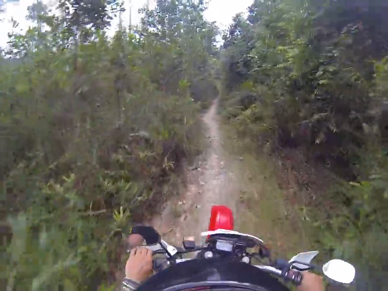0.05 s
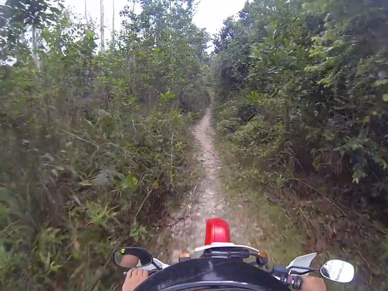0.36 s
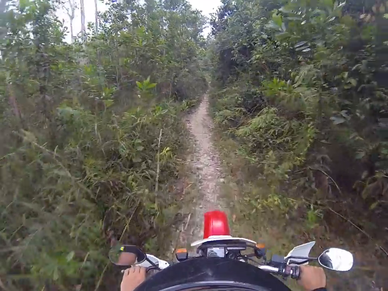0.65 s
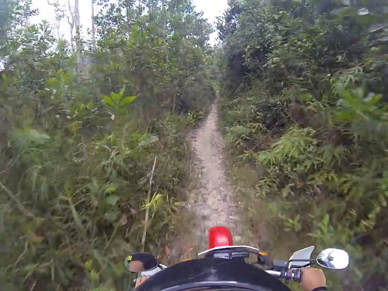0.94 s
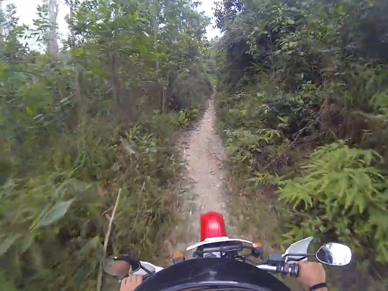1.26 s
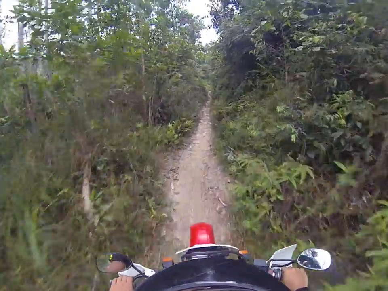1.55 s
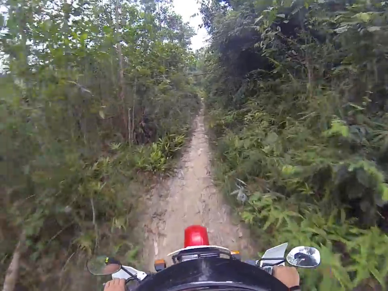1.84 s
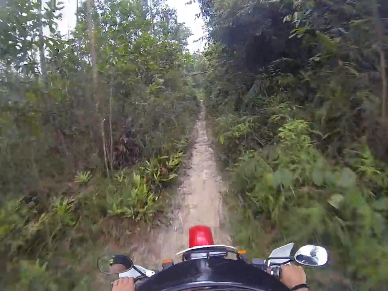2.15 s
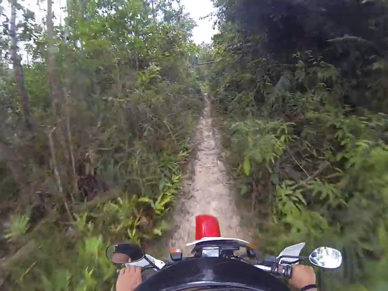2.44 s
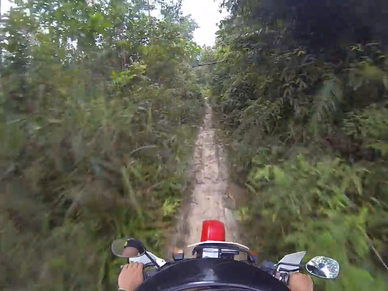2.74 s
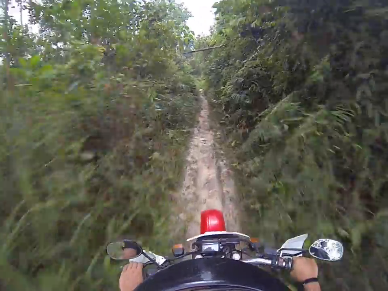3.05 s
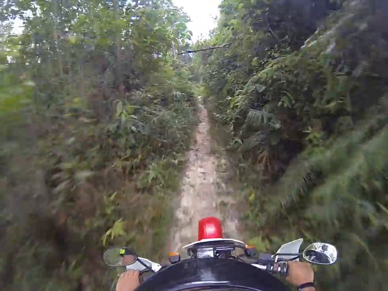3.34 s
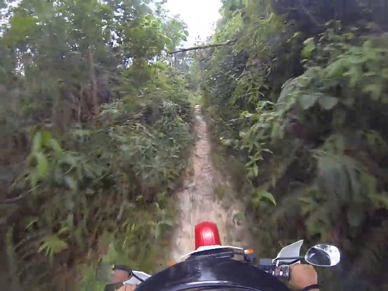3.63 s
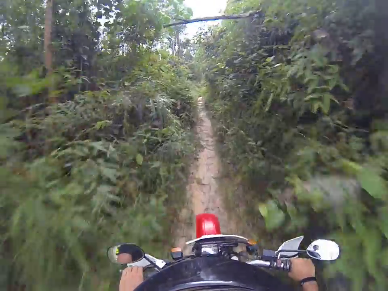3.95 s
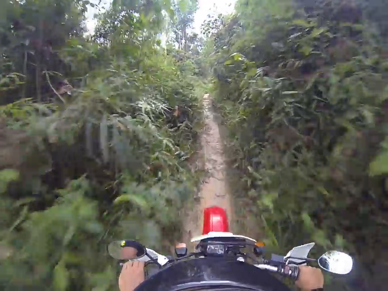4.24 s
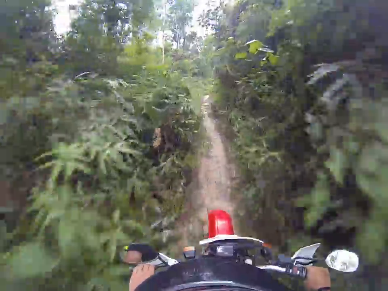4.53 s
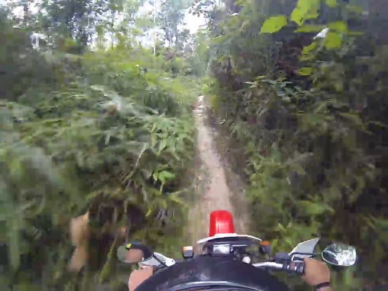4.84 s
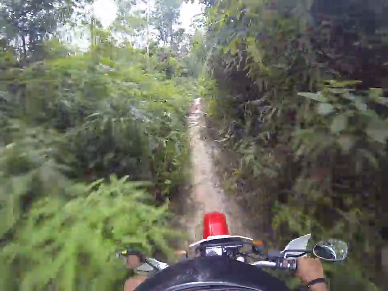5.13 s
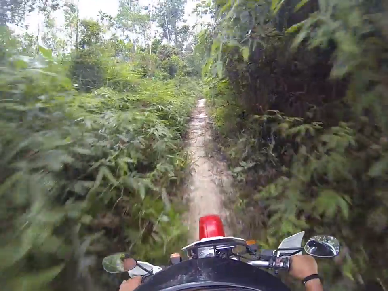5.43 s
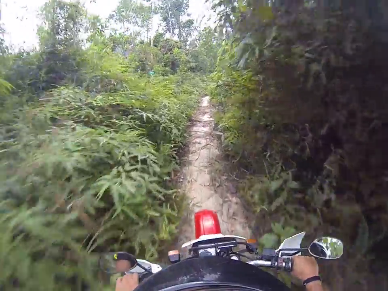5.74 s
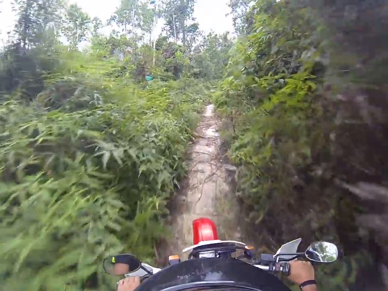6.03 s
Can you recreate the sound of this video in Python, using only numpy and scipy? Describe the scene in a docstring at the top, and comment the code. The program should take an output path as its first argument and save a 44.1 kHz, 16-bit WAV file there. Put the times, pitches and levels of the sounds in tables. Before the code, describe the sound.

Heard from the rider's position, a small motorbike engine chugs slowly with thudding exhaust and metallic ticking. Stony ground brings heavy low rumbling, sharp little rattles and hollow plastic taps. The engine picks up and pulls steadily as the trail smooths, then eases, revs once more and sinks back as leaves and twigs flick against the bike. A light hiss and a thin electronic whine continue throughout.

```python
"""A small four-stroke single-cylinder engine plods along a rough, overgrown trail.
Its piston shakes the bike once per crank turn and it fires once in two turns; these periodic forces
give a throb, exhaust thuds and the clatter of resonating metal. Bumps shake a camera worn by the rider
and set loose parts ringing, leaves brush past, and the camera's circuits add a thin pulsing whine."""
import sys
import numpy as np
from scipy import signal
from scipy.fft import rfft, irfft, next_fast_len
from scipy.io import wavfile
from scipy.ndimage import uniform_filter1d

SR = 44100
rng = np.random.default_rng(int(sys.argv[2]) if len(sys.argv) > 2 else 0)


def bounce(signal):
    """Save signal as a 16-bit WAV file at the path given by the first command-line argument."""
    frames = np.transpose(np.atleast_2d(signal))
    limited = np.clip(frames, -1, 1)
    pcm = np.round(limited * 32767).astype(np.int16)
    wavfile.write(sys.argv[1], SR, pcm)


N = 276948
TIME = np.arange(N) / SR


def crank_throb(cycle, firing_hz):
    """Forced vibration: the piston shakes the bike once per crank turn, two turns to a cycle."""
    lag = np.interp(firing_hz, [16.4, 21], [.35, .455])  # the sprung frame lags more at speed
    return unit(np.cos(4 * np.pi * (cycle - lag)) + undb(-27) * np.sin(2 * np.pi * 3 * cycle))


def exhaust(cycle, firing_hz):
    """Pulse excitation: each bang, and the exhaust puff after it, drives the block and the pipe."""
    # response of the engine block to combustion: frequency_hz, gain_db
    block_response = [(40, -32), (62, 10), (82, 4), (105, 5), (126, 2.5), (148, -10.5), (175, -1),
                      (230, -12.5), (400, -48.5)]
    # response of the exhaust: frequency_hz, gain_db
    exhaust_response = [(110, -25.5), (150, -8.5), (174, 0), (205, -3.5), (255, -3), (330, -3), (410, -19),
                        (540, -28), (700, -15), (1500, -69.5)]
    bang = unit(strokes(cycle, phase=0.123, scatter_db=-0.8, jitter_s=0.00022))
    puff = unit(strokes(cycle, phase=0.305, scatter_db=3.5, jitter_s=0.00053))
    thud = colour(bang + undb(1.5) * puff, block_response)
    # in the pipe the bang dominates under power, the puff at a crawl
    balance_db = np.interp(firing_hz, [16.5, 20.5], [-2.5, 3])
    gas = rng.standard_normal(N) * swell(cycle, phase=0.25, depth_db=2.5)
    flow = undb(balance_db) * bang + undb(-balance_db) * puff + undb(4.5) * gas
    bark = colour(pipe_echo(flow), exhaust_response)
    return undb(-2.5) * (thud + bark)


def pipe_echo(x, round_trip_hz=86, echo_db=-17):
    """Reflection: each pulse runs along the exhaust pipe and returns once, weaker."""
    return x + undb(echo_db) * np.roll(x, int(SR / round_trip_hz))


def valve_gear(cycle):
    """Impact excitation: tappet clicks and cam chain rattle ring the engine casing."""
    # resonances of the casing: frequency_hz, gain_db
    casing_response = [(250, -29.5), (450, -9), (540, -4), (640, -16), (760, -4.5), (850, -14), (950, -8),
                       (1060, -18.5), (1280, -4), (1510, 0), (1680, -3.5), (1900, -17), (2250, -15),
                       (3500, -53)]
    taps = sum(undb(db) * strokes(cycle, phase, scatter_db=0, jitter_s=0.00115)
               for phase, db in [(.12, -2), (.33, 2.5), (.78, -0.5), (.98, -1)])
    chain = grains(per_s=3500, spread_db=0.5) * swell(cycle, phase=0.27, depth_db=0.5)
    return colour(undb(-12) * unit(taps) + chain, casing_response)


def piston_slap(cycle, firing_hz):
    """Impact ringing: the rocking piston chatters on the cylinder, harder as the revs rise."""
    # resonance of the cylinder: frequency_hz, gain_db
    cylinder_response = [(700, -36.5), (1150, -34), (1400, -11), (1490, 10), (1555, 1.5), (1680, -3),
                         (2000, -35), (3000, -38.5)]
    blows = sum(strokes(cycle, phase, scatter_db=1.5, jitter_s=.0012) for phase in (.85, .9, .94, .99))
    force_db = np.interp(firing_hz, [17, 21], [-11, -4])
    return undb(force_db) * colour(blows, cylinder_response)


def hiss(cycle):
    """Amplitude-modulated noise: mechanical sizzle and tyre grit pulse a little with the engine."""
    # spectrum of the sizzle and grit: frequency_hz, gain_db
    spectrum = [(300, 5.5), (1900, 6.5), (2400, 5), (3000, 2.5), (3500, 2.5), (3880, 6.5), (4350, -6),
                (4750, -3.5), (5170, 2.5), (5800, -5.5), (7000, -5.5), (10500, -16), (13000, -14),
                (14500, -55)]
    grit = grains(per_s=1500, spread_db=2.5)
    sizzle = rng.standard_normal(N) + undb(-3) * grit
    pulsing = sizzle * swell(cycle, phase=0.31, depth_db=1.1)
    return colour(pulsing * undb(0.89 * drift(25)), spectrum)


def ruts(ground_db, rise_s=0.08, settle_s=0.092):
    """Power summation: jolts add to the ground's shaking. Gives its gain and the throb's change in dB."""
    # ruts that jolt the bike: peak_s, shaking_db, throb_change_db
    jolts = [(.1, -24, 9.5), (.66, -24, -8), (.88, -42, 7.5), (1.13, -18.5, 6), (1.52, -19.5, 5),
             (1.78, -26, -12), (2.25, -25, -5.5), (2.48, -22, 6), (3.16, -26, 2), (3.75, -25, -0.5),
             (3.97, -25.5, 4.5), (4.86, -22, -1), (5.72, -26.5, 2.5)]
    power, throb_change_db = undb(ground_db) ** 2, 0
    for peak_s, shaking_db, change_db in jolts:
        width_s = np.where(TIME < peak_s, rise_s, settle_s)
        jolt = np.exp(-((TIME - peak_s) / width_s) ** 2)
        power = power + (undb(shaking_db) * jolt) ** 2
        throb_change_db = throb_change_db + change_db * jolt
    return np.sqrt(power), throb_change_db


def shake():
    """Random vibration: the trail shakes the rider and camera with a deep rumble."""
    # spectrum of the shaking: frequency_hz, gain_db
    spectrum = [(3, -17.5), (7, 9.5), (13, 3), (23, -2), (33, -4), (44, -19), (60, -20), (78, -37.5),
                (150, -36), (300, -82.5)]
    rumble = colour(rng.standard_normal(N), spectrum)
    # evened out, so that the size of each bump sets its strength
    return rumble / np.sqrt(uniform_filter1d(rumble ** 2, SR // 6) + 0.045)


def knocks(ground_db, bounce_s=0.0025, scrape_t60_s=0.055, focus_db=9, focus_hz=130):
    """Modal ringing: a loose part strikes, scrapes and bounces; the spot it hits favours some modes."""
    # blows of loose parts on bumps: start_s, relative_level_db, centre_hz
    blows = [(.024, -37, 1300), (.1344, -42.5, 1250), (.5252, -39, 1460), (.5601, -36.5, 1220),
             (.7047, -38.5, 1240), (.8005, -39, 1330), (1.076, -43, 1410), (1.0939, -39.5, 1210),
             (1.4985, -39, 1350), (1.5766, -40, 1310), (2.141, -40.5, 1490), (2.198, -39.5, 1570),
             (2.2614, -43.5, 1220), (2.4294, -44, 1530), (2.4698, -45.5, 1440), (3.1532, -45.5, 1260),
             (4.5356, -41.5, 1190), (4.6109, -41, 1190), (4.784, -38, 1200), (4.859, -41, 1480),
             (5.1653, -39.5, 1580), (6.2146, -43, 1260)]
    # modes of the frame and bodywork: pitch_hz, gain_db, t60_s
    modes = [(518, -28, 0.18), (1239, 3.5, 0.04), (1404, 6, 0.048), (1570, 2.5, 0.028), (1770, -30, .025),
             (2207, 0.5, 0.039)]
    out, t = np.zeros(N), TIME[:SR // 8]
    contact_band = signal.butter(2, [1000, 2300], "band", fs=SR, output="sos")
    soft_onset = 1 - np.exp(-t / 0.00026)
    for start_s, db, centre_hz in blows + rattles(ground_db):
        ring = 0
        for hz, mode_db, t60_s in modes:
            favour_db = focus_db * (np.exp(-((hz - centre_hz) / focus_hz) ** 2) - 1)
            detuned_hz = hz * (1 + 0.018 * rng.standard_normal())
            ring += undb(mode_db + favour_db - 60 * t / t60_s) * np.sin(2 * np.pi * detuned_hz * t)
        friction = unit(signal.sosfilt(contact_band, rng.standard_normal(len(t))))
        scrape = friction * undb(-15 - 60 * t / scrape_t60_s)
        add(out, start_s, undb(db) * (ring + scrape) * soft_onset)
        add(out, start_s + bounce_s * (1 + rng.random()), undb(db - 2) * scrape)
    return out


def rattles(ground_db, per_s=2.5):
    """A Poisson process of light blows, stronger on rough ground: start_s, relative_level_db, centre_hz."""
    onsets = np.flatnonzero(rng.random(N) < per_s / SR)
    chance = rng.standard_normal((64, 2))
    return [(i / SR, ground_db[i] - 23 + 1.5 * size, 1300 + 100 * spot)
            for i, (size, spot) in zip(onsets, chance)]


def panel(pitch_hz=548, t60_s=0.066):
    """Damped oscillation: a bumped plastic panel rings hollowly in a single mode."""
    # bumps of the panel: start_s, relative_level_db
    bumps = [(.128, -51), (.256, -45), (.281, -46), (.497, -48), (.54, -49), (.677, -43.5), (.733, -48),
             (1.348, -48), (2.17, -47), (3.522, -47.5), (4.27, -47.5)]
    out, t = np.zeros(N), TIME[:SR // 6]
    soft_onset = 1 - np.exp(-t / 0.0021)
    for start_s, db in bumps:
        tone = np.sin(2 * np.pi * pitch_hz * (1 + 0.01 * rng.standard_normal()) * t)
        add(out, start_s, tone * undb(db - 60 * t / t60_s) * soft_onset)
    return out


def leaves():
    """Friction noise: each leaf or twig brushing the bike gives a short, crackling swish."""
    # brushing contacts: peak_s, length_s, relative_level_db, centre_hz, band_edge_ratio
    brushes = [(.33, .06, -66, 5500, 1.25), (0.563, 0.016, -61, 6500, 1.6), (0.777, .07, -70, 5000, 1.6),
               (0.98, 0.023, -62, 9000, 1.6), (1.411, .001, -54, 9500, 1.15),
               (1.637, 0.018, -62.5, 9700, 1.16), (2.43, 0.043, -71, 9000, 1.3),
               (4.696, 0.0085, -50.5, 3600, 1.35), (5.097, 0.0033, -59, 5000, 1.6),
               (5.163, 0.008, -53.5, 4500, 1.47), (5.184, 0.081, -63.5, 7400, 1.4),
               (5.352, 0.051, -69, 7000, 1.5)]
    out, crackle = np.zeros(N), grains(per_s=8000, spread_db=2)
    for peak_s, length_s, db, hz, ratio in brushes:
        band = signal.butter(2, [hz / ratio, hz * ratio], "band", fs=SR, output="sos")
        envelope = np.exp(-2 * np.minimum(((TIME - peak_s) / length_s) ** 2, 20))
        out += undb(db) * unit(signal.sosfilt(band, crackle)) * envelope
    return out


def whine(burst_hz=47.952, duty=0.4):
    """Gated oscillation: the camera's circuits sing in even bursts, each at a new random phase."""
    # tones of the circuits: pitch_hz, level_db
    partials = [(6428, -59), (12877, -63)]
    clock = (TIME - .014) * burst_hz + 1.5
    burst = clock.astype(int)
    gate = uniform_filter1d(1. * (np.abs(clock % 1 - .5) < duty / 2), size=24)
    tones = sum(undb(db) * np.sin(2 * np.pi * (hz * TIME + rng.random(burst[-1] + 1)[burst]))
                for hz, db in partials)
    return gate * undb(.5 * drift(92)) * tones


def strokes(cycle, phase, scatter_db, jitter_s):
    """An impulse train: one blow per cycle at a phase from 0 to 1, uneven in size and timing."""
    onsets = np.flatnonzero(np.diff(np.floor(cycle - phase)) > 0)
    timing, size = rng.standard_normal((256, 2))[:len(onsets)].T
    out = np.zeros(N)
    out[np.clip(onsets + (jitter_s * SR * timing).astype(int), 0, N - 1)] = undb(scatter_db * size)
    return out


def swell(cycle, phase, depth_db):
    """Amplitude modulation: a gain that peaks once per engine cycle."""
    return unit(undb(depth_db * np.cos(2 * np.pi * (cycle - phase))))


def grains(per_s, spread_db):
    """Shot noise: tiny clicks at random times and of uneven size."""
    sizes = rng.standard_normal(N) * undb(spread_db * np.minimum(rng.exponential(size=N), 4))
    return unit(sizes * (rng.random(N) < per_s / SR))


def colour(x, response):
    """Minimum-phase filtering: x passes through a body with the given response and leaves at rms 1."""
    size = next_fast_len(N + SR // 4, True)
    hz, db = np.transpose(response)
    bin_hz = np.arange(size // 2 + 1) * SR / size
    log_gain = np.interp(np.log(bin_hz + 1e-9), np.log(hz), np.log(undb(db)))
    cepstrum = irfft(log_gain, size)
    cepstrum[1:size // 2] *= 2  # folding onto positive time makes the filter causal
    cepstrum[size // 2 + 1:] = 0
    return unit(irfft(rfft(x, size) * np.exp(rfft(cepstrum)), size)[:N])


def drift(rate_hz):
    """Smooth random fluctuation of rms 1."""
    hold = int(SR / rate_hz)
    steps = np.repeat(rng.standard_normal(N // hold + 1), hold)
    return unit(uniform_filter1d(steps, hold)[:N])


def curve(points):
    """Linear interpolation between (time_s, value) points."""
    return np.interp(TIME, *np.transpose(points))


def add(out, start_s, x):
    """Mix x into out from start_s."""
    i = max(int(start_s * SR), 0)
    out[i:i + len(x)] += x[:max(N - i, 0)]


def undb(db):
    """Decibels to gain."""
    return 10 ** (np.asarray(db) / 20)


def unit(x):
    """Scale to rms 1."""
    return x / np.sqrt(np.mean(x ** 2))


def scene(crawl_hz=16):
    """Superposition: the engine, driven by speed and effort, adds to the trail's noises and the whine."""
    # engine speed: time_s, firing_hz
    speed = [(0.0, 16.26), (0.8, 16.47), (1.11, 19.29), (1.48, 18.38), (1.69, 19.65), (2.36, 21.62),
             (2.6, 20.62), (2.78, 21.62), (3.2, 21.06), (3.63, 21.9), (4.21, 21.09), (4.81, 19.58),
             (4.94, 16.4), (5.1, 15.99), (5.33, 20.67), (6.02, 16.44), (6.28, 16.95)]
    # engine effort relative to steady pulling: time_s, effort_db
    effort = [(0, -0.5), (.8, 0.5), (1.45, -0.55), (2.2, .6), (2.7, 0.16), (3.9, 0), (4.72, -0.5),
              (5.0, -4), (5.3, -1.1), (5.65, -4), (6.28, -2)]
    # roughness of the trail, stony at first and then smoother: time_s, shaking_db
    ground = [(0, -25), (.65, -22.5), (1.6, -24.5), (2.0, -31), (3.3, -30.5), (4.6, -26), (5.4, -30),
              (6.28, -28.5)]
    firing_hz, effort_db, ground_db = curve(speed), curve(effort), curve(ground)
    cycle = np.cumsum(firing_hz) / SR
    above_crawl_hz = firing_hz - crawl_hz
    shake_gain, throb_change_db = ruts(ground_db)
    thuds = undb(-46.5 + effort_db - 0.324 * above_crawl_hz) * exhaust(cycle, firing_hz)
    # the frame passes less of the throb as the revs rise
    throb_db = -28 - 0.67 * above_crawl_hz + throb_change_db + 1.5 * drift(8)
    throb = undb(throb_db) * crank_throb(cycle, firing_hz)
    clatter_db = -51.5 + effort_db - 0.1753 * above_crawl_hz
    clatter = undb(clatter_db) * (valve_gear(cycle) + piston_slap(cycle, firing_hz))
    sizzle = undb(-56.5 + 1.08 * effort_db + 0.0753 * above_crawl_hz) * hiss(cycle)
    trail = shake_gain * shake() + undb(5.5) * panel() + undb(-1) * leaves()
    return (thuds + throb + clatter + sizzle + trail + whine() + undb(-0.8) * knocks(ground_db))[None]


def record(dry, cutoff_hz=14700):
    """Low-pass filtering: the camera cuts the top of the treble."""
    return signal.sosfilt(signal.ellip(8, .2, 70, cutoff_hz, fs=SR, output="sos"), dry)


dry = scene()
out = record(dry)
bounce(out)
```